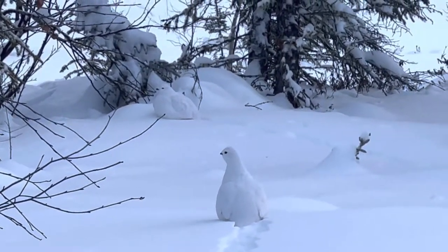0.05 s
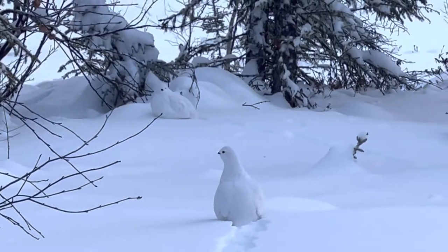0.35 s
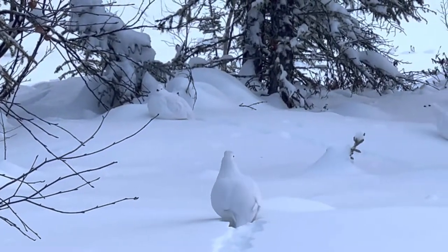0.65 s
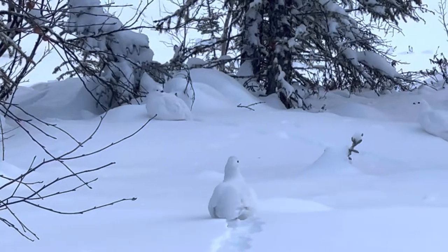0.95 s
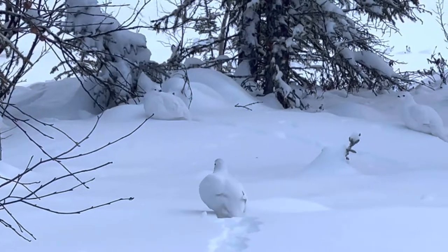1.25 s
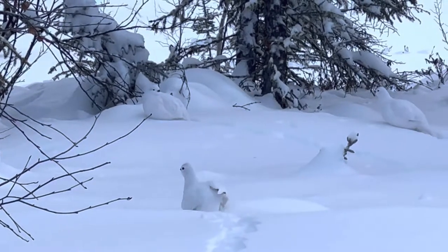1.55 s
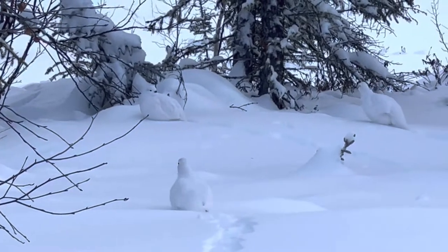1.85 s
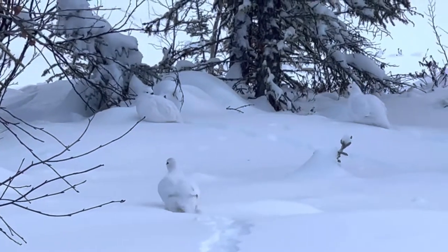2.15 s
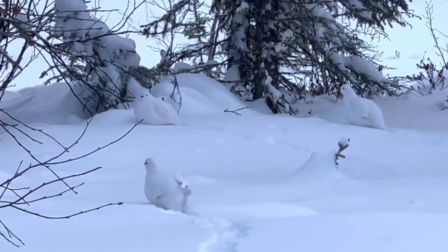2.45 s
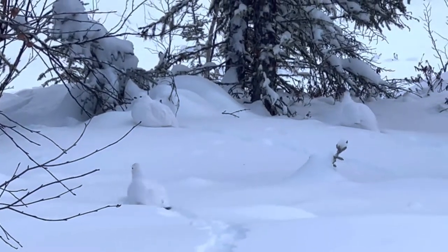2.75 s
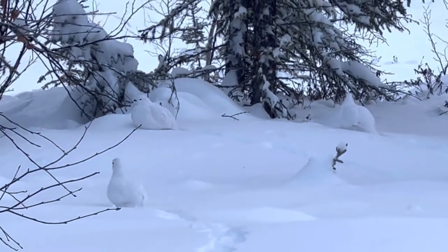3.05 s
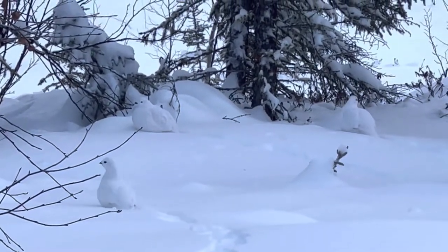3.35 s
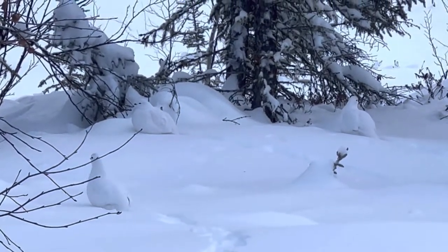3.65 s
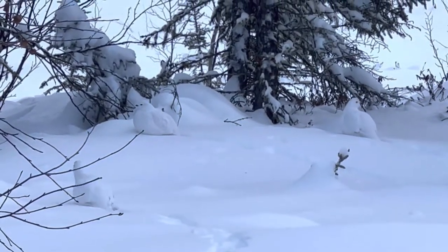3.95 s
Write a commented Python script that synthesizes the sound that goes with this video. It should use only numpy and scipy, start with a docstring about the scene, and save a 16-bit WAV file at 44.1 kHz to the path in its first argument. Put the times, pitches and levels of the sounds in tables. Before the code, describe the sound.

A big engine idles far off with a low throb, as wind buffets the microphone.

```python
"""A low throb, repeating five times a second: a big engine idles far off across a snowy clearing.
Its eight cylinders fire unevenly into two exhausts; its level dips from about 1 s to 1.9 s.
Wind turbulence rumbles on the microphone, and eddies buffet it in two flurries.
Behind lie a soft outdoor wash with a few faint narrow bands, and the microphone's hiss."""
import sys
import numpy as np
from scipy import signal
from scipy.fft import rfft, irfft
from scipy.io import wavfile
from scipy.ndimage import uniform_filter1d

SR = 44100
rng = np.random.default_rng(int(sys.argv[2]) if len(sys.argv) > 2 else 0)


def generate_wav(signal):
    """Clip the signal to [-1, 1] and save it as 16-bit WAV at the path in sys.argv[1]."""
    frames = np.transpose(np.atleast_2d(signal))
    scaled = np.clip(frames, -1, 1) * 32767
    pcm = np.round(scaled).astype(np.int16)
    wavfile.write(sys.argv[1], SR, pcm)


N = 176400
T, HZ = np.arange(N) / SR, np.fft.rfftfreq(N, 1 / SR)
WIND_SIDE_DB = -17.5  # side re mid


def engine(cycle_hz=4.994, wander=0.0016, trim_db=0.2, side_db=-18):
    """Eight cylinders fire unevenly into two exhausts: clean lines on multiples of the cycle rate."""
    # engine lines: multiple of the cycle rate, level/dB
    orders = [(8, -37.5), (11, -37), (12, -44), (13, -31), (14, -48), (15, -41), (16, -33), (17, -45),
              (18, -50), (19, -35), (23, -51), (24, -35), (25, -42), (26, -50), (27, -43), (29, -47),
              (30, -43), (31, -51), (33, -48), (35, -52), (40, -57), (47, -56), (50, -53), (51, -56)]
    # exhaust of each cylinder in firing order: +1 short pipe, -1 long pipe
    firing = [1, -1, -1, 1, -1, 1, 1, -1]
    # engine envelope: t/s, gain/dB
    envelope = [(0, 0), (.95, 0.5), (1.08, -9), (1.2, -13), (1.58, -9), (1.74, -9.5), (1.9, -0.5), (2.6, 0),
                (4, -1.5)]
    bank_lag_rad, scatter_rad, cylinder_spread = 0.63, 0.44, 0.042
    turns = np.cumsum(cycle_hz * (1 + wander * drift(rate_hz=11))) / SR + rng.random()
    strengths = 1 + cylinder_spread * rng.standard_normal(len(firing))
    pattern = np.fft.fft(strengths * np.exp(1j * bank_lag_rad * np.array(firing)))
    size = 4096
    lines = np.zeros(size, complex)
    for order, db in orders:
        phase_rad = np.angle(pattern[int(order) % len(firing)]) + scatter_rad * rng.standard_normal()
        lines[int(order)] = np.sqrt(2) * amp(db) * np.exp(1j * phase_rad)
    one_cycle = size * np.fft.ifft(lines)
    throb = np.interp(turns, np.arange(size) / size, one_cycle, period=1)
    return stereo(throb.real, amp(side_db) * throb.imag) * amp(trim_db) * level(envelope)


def wind_rumble(swell_db=0.8):
    """Lumpy turbulence at the microphone, following the wind's strength."""
    # rumble spectrum: f/Hz, relative density/dB
    spectrum = [(10, -37.5), (25, -23.5), (40, -4), (65, 7), (100, -1), (140, -3.5), (190, -10.5),
                (260, -23), (380, -40.5), (600, -48), (1500, -82.5)]
    # wind strength between buffets: t/s, level/dB
    strength = [(0, -16.5), (.2, -28.5), (.36, -36), (.55, -23.5), (.93, -32.5), (1.12, -34), (1.35, -37),
                (1.6, -41.5), (1.85, -30), (2.25, -45.5), (2.55, -43), (2.8, -26.5), (2.95, -39.5),
                (3.2, -27), (3.55, -28.5), (3.8, -30), (4, -29)]
    air = stereo(noise(colour(spectrum)), amp(WIND_SIDE_DB) * noise(colour(spectrum)))
    lumps = unit(amp(swell_db * drift(rate_hz=18)))
    return air * level(strength) * lumps


def wind_buffets(pitch_sag=0.034, thump_trim_db=-4.5, flutter_trim_db=-2.5, scuff_trim_db=-5):
    """Each eddy is a brief pressure swing: a low thump, with flutter and scuff when it hits hard."""
    # eddies: centre t/s, length/s, thump f/Hz, relative levels of thump/dB, flutter/dB, scuff/dB
    eddies = [(0.022, 0.047, 93, -14.5, -26.5, -37), (0.03, 0.052, 132, -16, -32, -38.5),
              (0.088, 0.023, 94.7, -17.5, -41, -32), (0.129, 0.027, 70, -10.5, -49, -46),
              (0.495, 0.034, 68, -12, -29.5, -62), (0.528, 0.031, 83.5, -16, -27, -55),
              (0.574, 0.04, 100, -25.5, -22.5, -31.5), (0.602, 0.024, 100, -24, -18.5, -33.5),
              (0.62, 0.042, 75, -9, -22, -26), (0.635, 0.029, 94, -28, -18, -19),
              (0.66, 0.033, 63.6, -28, -21.5, -32), (0.787, 0.036, 84, -12.5, -25, -49),
              (0.802, 0.022, 110, -24, -20, -23.5), (0.819, 0.046, 74, -13, -20.5, -23),
              (0.855, 0.068, 78, -21, -29.5, -37), (0.924, 0.025, 70.6, -18.5, -29.5, -46),
              (1.004, 0.029, 91.5, -13, -19.5, -40), (1.04, 0.044, 77.5, -11, -25, -33.5),
              (1.067, 0.025, 91, -14.5, -22.5, -57), (1.144, 0.035, 101, -28.5, -30, -59),
              (1.171, 0.024, 90, -21.5, -29.5, -36), (1.189, 0.019, 98, -43, -24, -30),
              (1.225, 0.028, 93, -26.5, -27, -30.5), (1.315, 0.026, 100, -42, -33, -41),
              (1.393, 0.033, 107, -24, -24.5, -32.5), (1.411, 0.042, 82.6, -23.5, -27.5, -34.5),
              (1.46, 0.04, 92, -28, -28, -44.5), (1.493, 0.03, 66.4, -24.5, -32, -43),
              (2.712, 0.034, 102, -17, -27, -58), (2.739, 0.034, 80, -11.5, -34, -56),
              (2.997, 0.0216, 107, -24, -23, -44), (3.019, 0.043, 71, -10.5, -34, -61),
              (3.091, 0.058, 80, -20.5, -36, -43.5), (3.121, 0.018, 107, -15, -23.5, -24.5),
              (3.129, 0.026, 127.6, -16, -14.5, -28), (3.15, 0.046, 54, -10.5, -39, -66),
              (3.25, 0.0248, 100, -16.5, -23, -36.5), (3.269, 0.03, 80, -14, -25, -50),
              (3.301, 0.023, 64, -18, -23, -34), (3.377, 0.023, 121, -16, -27.5, -45),
              (3.403, 0.032, 130, -14.5, -27, -40.5), (3.421, 0.054, 72, -10, -36.5, -53),
              (3.623, 0.026, 70, -12.5, -30.5, -31.5), (3.647, 0.027, 99, -16.5, -25, -39),
              (3.66, 0.018, 110, -39, -25, -35)]
    out = np.zeros((2, N))
    for eddy, start_turns in zip(eddies, rng.random(len(eddies))):
        centre_s, length_s, thump_hz, thump_db, flutter_db, scuff_db = eddy
        span = abs(T - centre_s) < length_s / 2
        u = (T[span] - centre_s) / length_s
        swell = np.cos(np.pi * u) ** 2
        turns = thump_hz * length_s * (u - pitch_sag * u ** 2 / 2) + start_turns
        thump = unit(swell * np.sin(2 * np.pi * turns))
        flutter = puff(swell, low_hz=127, high_hz=260, db_per_octave=-3.5)
        scuff_top_hz = 459 + 5 * (scuff_db + 21.5)  # a harder hit reaches higher
        scuff = puff(swell, low_hz=275, high_hz=scuff_top_hz, db_per_octave=-6.5)
        out[:, span] += (amp(thump_db + thump_trim_db) * thump
                         + amp(flutter_db + flutter_trim_db) * flutter
                         + amp(scuff_db + scuff_trim_db) * scuff)
    return out / np.sqrt(2)


def puff(swell, low_hz, high_hz, db_per_octave):
    """Unit-power swell of band-limited turbulence, nearly the same in both ears."""
    size = 8192
    hz = np.fft.rfftfreq(size, 1 / SR)
    band = ((1 + (low_hz / (hz + 1)) ** 8) * (1 + (hz / high_hz) ** 12)) ** -.5
    tilt = amp(db_per_octave * np.log2(np.maximum(hz / low_hz, 1)))  # smaller eddies are weaker
    mid, side = irfft(rfft(rng.standard_normal((2, size))) * band * tilt)[:, :len(swell)]
    return unit(stereo(mid, amp(WIND_SIDE_DB) * side) * swell)


def outdoor_wash(mid_db=-45, side_db=-49.5, swell_db=0.2):
    """Distant wash, wide in the middle register, with faint narrow bands and microphone hiss."""
    # wash and hiss common to both ears: f/Hz, relative density/dB
    mid_spectrum = [(20, 0.5), (150, 8), (300, 4.5), (370, 3), (500, -1), (750, -7), (1000, -5.5),
                    (1400, -11.5), (2000, -17.5), (2700, -19), (3300, -23.5), (4500, -26), (6500, -30.5),
                    (8000, -29), (8800, -36), (10000, -53.5), (11200, -38.5), (12300, -34.5), (13100, -30),
                    (14200, -30), (15500, -44.5)]
    # part that differs between the ears: f/Hz, relative density/dB
    side_spectrum = [(20, -12.5), (250, 10.5), (400, 2.5), (650, 2), (900, 2), (1200, -4.5), (1700, -17.5),
                     (2300, -41), (4000, -37), (6500, -62), (8500, -27), (10500, -25.5), (13000, -36.5),
                     (15500, -35.5)]
    # faint narrow bands: f/Hz, width/Hz, level/dB
    bands = [(252.2, 28, -47), (359.3, 22, -59.5), (651, 130, -59), (822, 29, -66), (959, 52, -67.5),
             (1156, 18, -71), (1685, 42, -71.5), (2170, 65, -74), (2700, 98, -76), (2890, 47, -81),
             (2990, 120, -78), (3750, 66, -80), (3956, 57, -82), (4320, 60, -86), (4464, 45, -78.5),
             (4570, 25, -82.5), (4710, 53, -80), (4820, 35, -85), (5670, 55, -85), (5580, 70, -80.5),
             (5860, 55, -86), (13576, 60, -85.5)]
    wash = amp(mid_db) * noise(colour(mid_spectrum)) * amp(swell_db * drift(rate_hz=62))
    band_power = np.zeros(len(HZ))
    for centre_hz, width_hz, db in bands:
        peak = 1 / (1 + 2 * ((HZ - centre_hz) / width_hz) ** 2)
        band_power += (amp(db) * unit(peak)) ** 2
    whines = np.sqrt(band_power.mean()) * noise(np.sqrt(band_power))
    return stereo(flicker(wash + whines), amp(side_db) * noise(colour(side_spectrum)))


def flicker(x, depth_db=1.31):
    """The level flickers in small patches of time and pitch."""
    spectra = signal.stft(x, nperseg=512, noverlap=384)[2]
    patches = uniform_filter1d(rng.standard_normal(spectra.T.shape), size=14, axis=0)  # over time
    patches = unit(uniform_filter1d(patches, size=5, axis=1))  # over frequency
    return signal.istft(spectra * amp(depth_db * patches.T), nperseg=512, noverlap=384)[1][:N]


def amp(db):
    return 10 ** (np.asarray(db) / 20)


def unit(x):
    return x / np.sqrt(np.mean(x ** 2) + 1e-20)


def level(points):
    """Gain over time from rows of t/s, level/dB."""
    return amp(np.interp(T, *np.transpose(points)))


def colour(points):
    """Gain over frequency from rows of f/Hz, level/dB."""
    hz, db = np.transpose(points)
    return amp(np.interp(np.log(HZ + 1), np.log(hz), db))


def noise(gain):
    """Unit-power noise with the given spectrum."""
    return unit(irfft(rfft(rng.standard_normal(N)) * gain, N))


def drift(rate_hz):
    """Slow random motion, unit RMS."""
    return noise(np.exp(-(HZ / rate_hz) ** 2) * (HZ > 0))


def stereo(mid, side):
    return np.array([mid + side, mid - side])


def scene():
    return engine() + wind_rumble() + wind_buffets() + outdoor_wash()


def record(dry):
    """Soft ends and a steep low-pass."""
    fade_s, cutoff_hz = 0.008, 15650
    to_end_s = np.minimum(T, T[::-1])
    fade = np.sin(np.pi / 2 * np.minimum(to_end_s / fade_s, 1)) ** 2
    low_pass = signal.firwin(511, cutoff_hz, window=("kaiser", 9), fs=SR)
    return signal.oaconvolve(dry * fade, low_pass[None], "same")


dry = scene()
out = record(dry)
generate_wav(out)
```